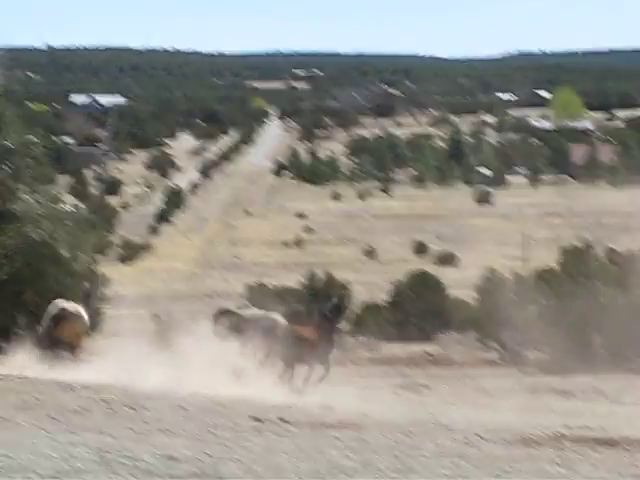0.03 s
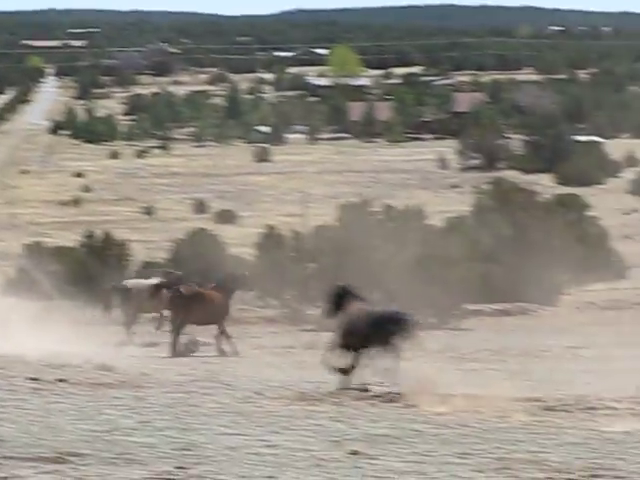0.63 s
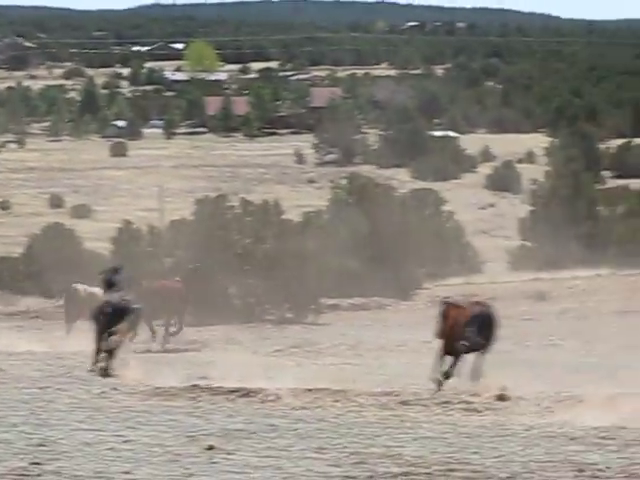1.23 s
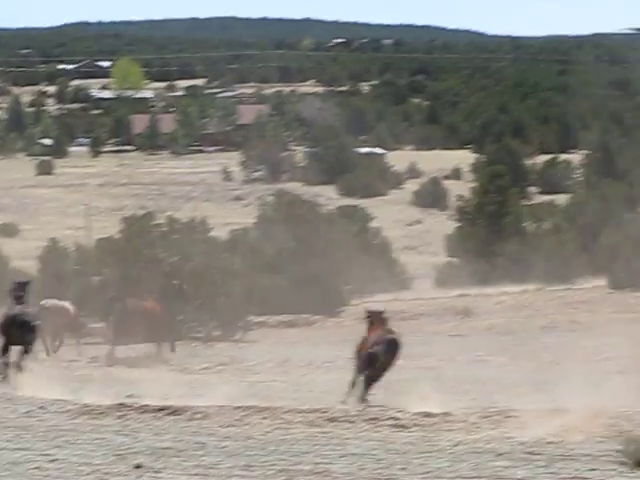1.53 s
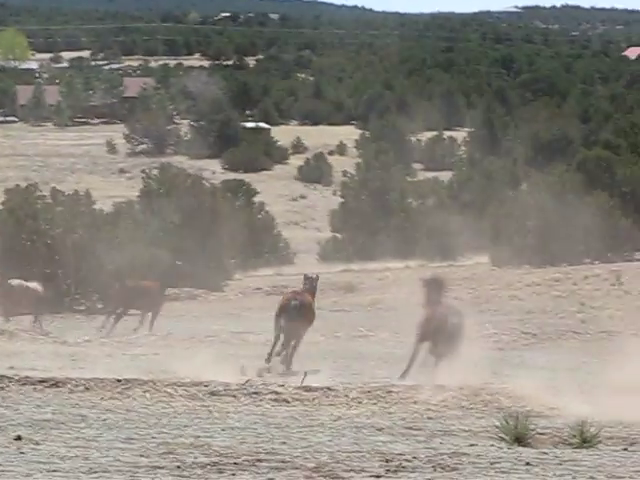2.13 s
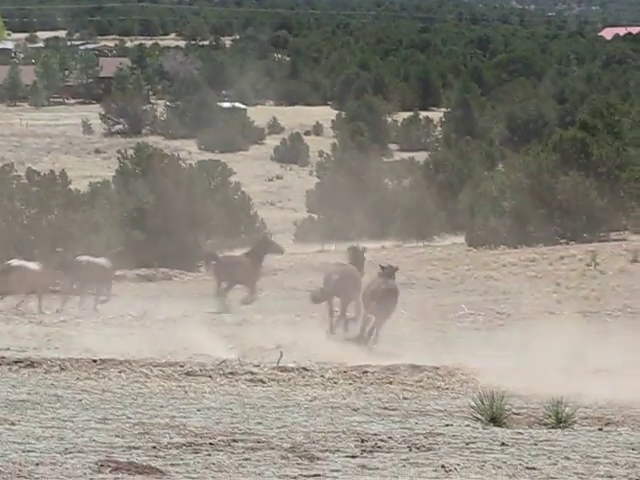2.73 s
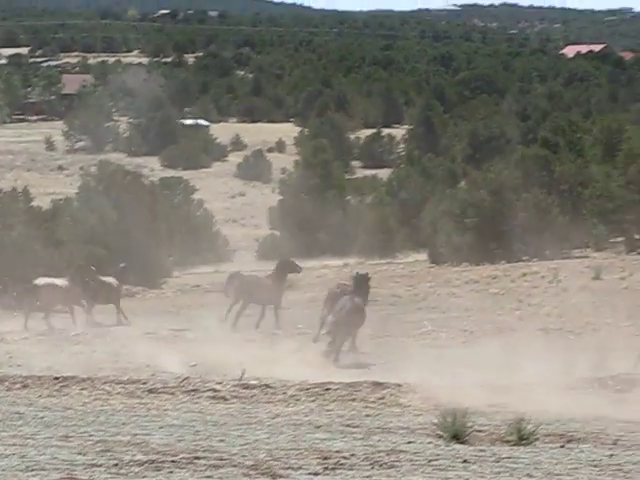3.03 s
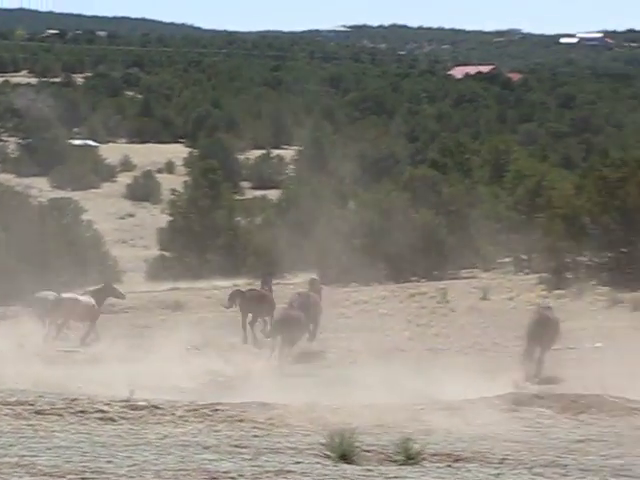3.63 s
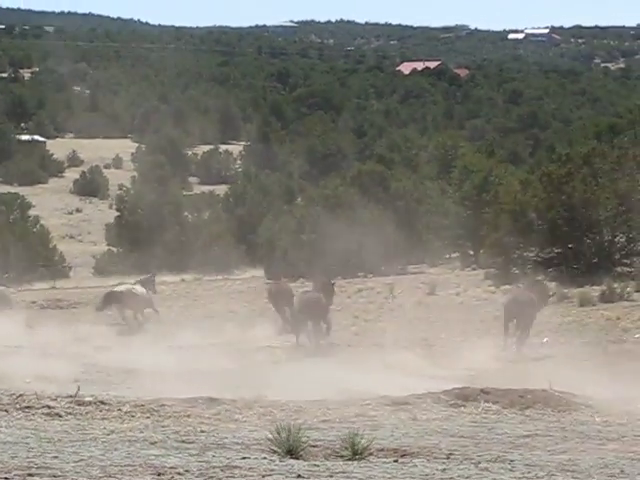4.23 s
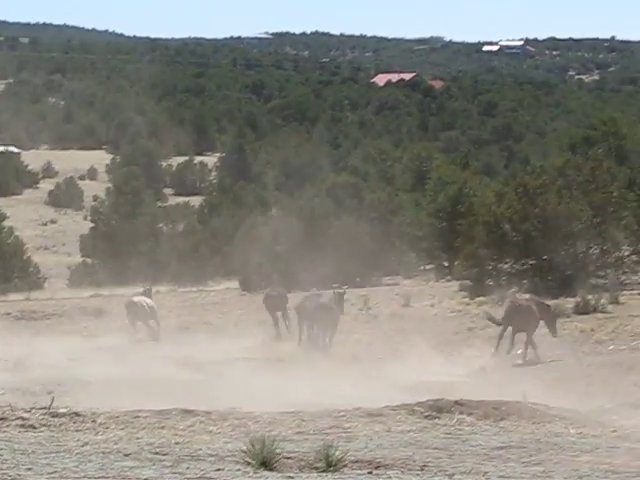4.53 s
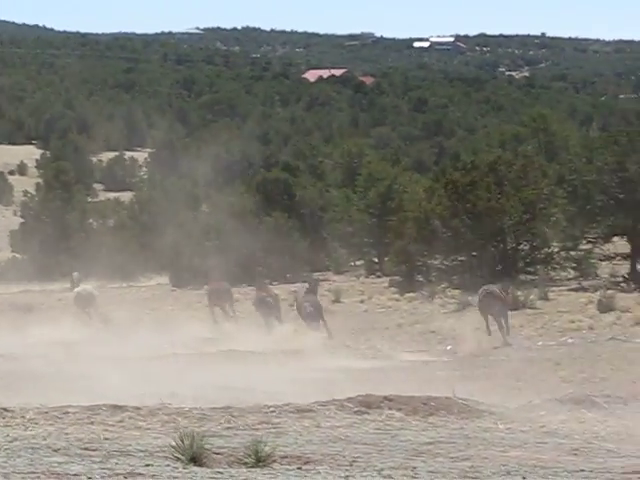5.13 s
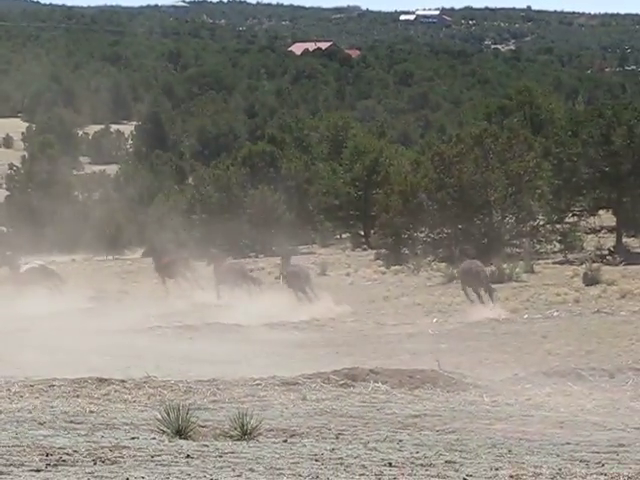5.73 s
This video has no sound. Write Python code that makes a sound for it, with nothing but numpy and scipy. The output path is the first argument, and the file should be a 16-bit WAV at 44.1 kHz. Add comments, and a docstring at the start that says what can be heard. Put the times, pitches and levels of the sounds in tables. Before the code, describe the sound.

From the start, wind buffets a small camera microphone with a low, uneven rumble, the loudest sound throughout. Underneath, several horses gallop over dry ground, their dull, overlapping hoofbeats almost covered. A distant songbird warbles in quick, high, slurred whistles, clearest at about 1.3 seconds, over a faint steady hiss. From about 0.8 seconds the wind breaks into short slaps and tiny gaps. It hits hardest between 1.8 and 2.3 seconds, where the peaks briefly push down the bird and hiss and leave a faint crackle. More slaps come between 3 and 3.5 seconds. After that the wind gradually eases, stalls for a moment just before 5 seconds, then returns and weakens toward the end near 6 seconds. The bird becomes fainter and sparser in the second half, and the hoofbeats slowly recede across the open pasture.

```python
"""A herd gallops away over a dry pasture on a gusty day, heard through a small camera.
From the start, wind buffets the microphone and all but covers the dull hoofbeats; a songbird warbles
far off. Around two seconds in, the gusts slap hardest, and on their peaks the camera's limiter ducks
bird and hiss, crackling faintly. Later the wind eases, stalling briefly near five seconds, while the
bird grows fainter and the hooves slowly recede."""
import sys
import numpy as np
from scipy import signal
from scipy.io import wavfile

SR = 44100
rng = np.random.default_rng(int(sys.argv[2]) if len(sys.argv) > 2 else 0)


def master_out(mix):
    """Clip the mix to full scale and print it as 16-bit PCM to the path in sys.argv[1]."""
    frames = np.transpose(np.atleast_2d(mix))
    ceiling = np.clip(frames, -1, 1)
    pcm = np.round(ceiling * 32767).astype(np.int16)
    wavfile.write(sys.argv[1], SR, pcm)


N = 258867
TIME = np.arange(N) / SR


def from_db(db):
    """Decibels to gain."""
    return 10 ** (np.asarray(db) / 20)


def unit_rms(x):
    """Scale to an rms of 1."""
    return x / np.sqrt(np.mean(x ** 2) + 1e-20)


def db_at(curve, hz):
    """Read an EQ curve on a log-frequency axis."""
    curve_hz, curve_db = np.transpose(curve)
    return np.interp(np.log(hz), np.log(curve_hz), curve_db)


def butter(x, hz, kind, order=2):
    """Butterworth filter."""
    sections = signal.butter(order, np.clip(hz, 10, .45 * SR), kind, fs=SR, output="sos")
    return signal.sosfilt(sections, x + 1e-18)


def drift(rate_hz):
    """Smooth random wander with a spread of 1, drawn at a tenth of the sample rate."""
    pole = np.exp(-20 * np.pi * rate_hz / SR)
    noise = rng.standard_normal(N // 10 + 4002)
    slow = signal.lfilter([1], [1, -2 * pole, pole * pole], noise)[4000:]
    return np.interp(np.arange(N) / 10, np.arange(len(slow)), unit_rms(slow))


def noise_bands():
    """Yield centre in Hz and samples for half-octave bands of noise with unit power per Hz."""
    edges_hz = 22 * 2 ** np.arange(0, 9.6, .5)
    white = rng.standard_normal((2, N)) * np.sqrt(SR / 2)
    for k, (low, high) in enumerate(zip(edges_hz, edges_hz[1:])):
        yield np.sqrt(low * high), butter(white[k % 2], [low, high], "band", order=3)


# The tone of the background bed. Each row: frequency in Hz, relative level in dB.
HISS_COLOUR = [(100, 10.5), (1000, 14), (2000, 2.5), (4000, 1.5), (6000, -0.5), (9000, -3), (12000, -1),
               (15500, -5)]

def hiss(level_db=-51.5):
    """Microphone hiss and far countryside blend into a steady, smooth bed."""
    bed = sum(band * from_db(db_at(HISS_COLOUR, hz)) for hz, band in noise_bands())
    return from_db(level_db) * unit_rms(bed)


# Touches of fizz on top. Each row: start in seconds, length in seconds, level in dB.
SIZZLE_CUES = [(1.276, 0.047, -56.5), (1.512, 0.11, -56.5)]

def sizzle(band_hz=(10000, 13200)):
    """Two faint, brief sizzles swell and fade high in the treble."""
    swell = sum(from_db(db) * np.sin(np.pi * np.clip((TIME - start) / length, 0, 1))
                for start, length, db in SIZZLE_CUES)
    return swell * unit_rms(butter(rng.standard_normal(N), band_hz, "band"))


# The bird's pitch bends, by name. Each entry: offset in semitones at start, middle and end.
SLUR_SHAPES = {"fall": (3, 0, -3), "rise": (-2, 0, 3), "arch": (-3.5, 0, -4.5), "dip": (5, 0, 6),
               "hold": (-1.5, 0, -.7)}
# The song. Each row: start in seconds, length in seconds, middle pitch in Hz, level in dB, slur name.
SYLLABLES = [(0.128, .05, 3080, -46, "fall"), (0.317, 0.066, 4200, -41, "arch"),
             (0.448, 0.058, 4200, -55.5, "fall"), (0.664, 0.088, 3140, -47, "dip"),
             (0.732, .065, 2950, -51, "dip"), (1.028, .036, 5480, -48, "rise"),
             (1.146, 0.05, 3920, -46, "hold"), (1.268, 0.061, 3890, -39.5, "hold"),
             (1.327, 0.059, 3420, -41, "rise"), (1.378, 0.031, 3620, -35.5, "fall"),
             (1.422, .05, 4250, -50, "rise"), (1.522, 0.031, 4270, -43, "hold"),
             (1.544, 0.046, 3650, -43.5, "fall"), (1.71, 0.056, 4240, -46, "fall"),
             (1.869, 0.091, 3900, -46, "arch"), (2.224, 0.071, 4040, -48, "fall"),
             (2.407, 0.038, 3830, -48, "fall"), (2.455, 0.048, 3540, -46, "fall"),
             (2.617, 0.035, 3160, -53, "fall"), (2.72, .035, 3650, -43, "fall"),
             (2.755, .035, 3400, -45, "hold"), (2.859, .075, 3620, -53.5, "hold"),
             (3.54, 0.063, 3300, -56, "fall"), (3.73, .041, 3300, -54, "fall"),
             (3.775, 0.039, 4180, -46.5, "arch"), (3.84, .04, 4550, -59, "rise"),
             (4.083, .06, 3650, -59, "fall"), (4.276, 0.057, 4200, -54, "rise"),
             (4.285, .04, 3300, -54, "dip"), (4.412, 0.05, 3580, -56, "fall"),
             (4.612, .045, 3900, -48, "arch"), (4.645, .048, 3350, -47, "fall"),
             (5.208, 0.075, 3030, -58.5, "dip"), (5.425, 0.099, 3420, -66, "dip")]

def bird(tremble=0.014, ragged_db=4, second_voice_db=-11, second_ratio=1.13, echo_db=-31, echo_s=0.057):
    """Quick slurred whistles from both sides of the syrinx, scattered by junipers and moving air."""
    direct, scattered = np.zeros(N), np.zeros(N)
    waver = 1 + tremble * drift(190)
    for start, length, middle_hz, db, slur in SYLLABLES:
        on = (TIME >= start) & (TIME < start + length)
        progress = (TIME[on] - start) / length
        semitones = np.polyval(np.polyfit([0, .5, 1], SLUR_SHAPES[slur], 2), progress)
        pitch_hz = middle_hz * 2 ** (semitones / 12) * waver[on]
        phase = 2 * np.pi * np.cumsum(pitch_hz) / SR
        voices = np.sin(phase) + from_db(second_voice_db) * np.sin(second_ratio * phase)
        note = np.sin(np.pi * progress) ** 0.25 * voices
        direct[on] += from_db(db) * note
        scattered[on] += from_db(0.5 * db) * note   # fainter notes come through wetter
    tree_tail = rng.standard_normal(SR // 4) * np.exp(-TIME[:SR // 4] / echo_s)
    echo = signal.fftconvolve(scattered, tree_tail / np.linalg.norm(tree_tail))[:N]
    return direct * from_db(ragged_db * drift(47)) + from_db(echo_db) * echo


def hooves(horses=5, stride_hz=2.1, level_db=-33, recede_db_per_s=-0.5, thud_hz=190,
           dirt_db=-17, dirt_hz=800, dirt_s=0.012):
    """Each horse lands four hooves a stride, then flies; a hoof thuds and throws up dry dirt."""
    footfalls = [0, .14, .36, .52]   # in fractions of a stride
    impacts = np.zeros(N)
    for phase, pace, lightness in rng.random((horses, 3)):
        beats = (np.arange(-1, 16)[:, None] + phase + footfalls).ravel()
        beats += rng.normal(0, 0.03, len(beats))   # loosen the timing
        own_stride_hz = stride_hz * (.95 + .1 * pace)
        at = (beats / own_stride_hz * SR).astype(int)
        heard = (at >= 0) & (at < N)
        impacts[at[heard]] += from_db(-6 * lightness + rng.normal(0, 0.94, len(at)))[heard]
    thud = butter(butter(impacts, thud_hz, "low"), 73, "high")
    puffs = signal.lfilter([1], [1, -np.exp(-1 / (dirt_s * SR))], impacts + 1e-18)
    dirt = butter(puffs * rng.standard_normal(N), dirt_hz, "low")
    fade = from_db(level_db + recede_db_per_s * TIME)
    return fade * (unit_rms(thud) + from_db(dirt_db) * unit_rms(dirt))


# The wind's fader moves. Each row: time in seconds, then rumble and flutter levels in relative dB.
GUSTS = [(0.0, -14.5, -29), (0.551, -15.5, -26.5), (1.149, -16, -29), (1.529, -23, -35.5),
         (1.598, -16.5, -28.5), (1.781, -14.5, -22), (2.249, -15.5, -23.5), (2.65, -14.5, -29),
         (2.9, -16, -26.5), (3.171, -12.5, -32), (3.421, -18, -41), (3.65, -16.5, -30), (4.0, -19, -37.5),
         (4.6, -17, -33.5), (5.12, -17, -33), (5.54, -19, -41), (5.61, -21.5, -48.5), (5.87, -19, -46)]

def gust_levels():
    """The wind rises and falls: level curves in dB for its low rumble and the flutter above it."""
    times, rumble_db, flutter_db = np.transpose(GUSTS)
    return np.interp(TIME, times, rumble_db), np.interp(TIME, times, flutter_db)


def heave(level_db=-6.0, full_wind_db=-15, top_hz=10):
    """Strong wind pushes slowly on the microphone port, below hearing, enough to work the limiter."""
    rumble_db, _ = gust_levels()
    strength_db = 1.5 * np.minimum(rumble_db - full_wind_db, 0)   # falls away faster than the rumble
    subsonic = butter(rng.standard_normal(N + SR), top_hz, "low", order=6)[SR:]
    pressure = from_db(level_db + strength_db) * np.tanh(unit_rms(subsonic))
    return butter(pressure, 2 * top_hz, "low", order=5)


# Fast eddies that slap the microphone.
# Each row: start in seconds, relative peak in dB, length in seconds, low-pass corner in Hz.
EDDY_HITS = [(0.022, -3.5, 0.0097, 566), (0.054, 0, 0.0041, 1190), (0.061, -6, .02, 1890),
             (0.813, -11, 0.0074, 1450), (0.866, -11.5, 0.0028, 1860), (0.879, 3.5, 0.0038, 404),
             (0.890, 3, 0.0012, 1550), (0.917, -15, 0.027, 1300), (0.924, 2, 0.0044, 3300),
             (1.014, -4, 0.011, 407), (1.083, -9, 0.039, 1106), (1.149, -10.5, .04, 1400),
             (1.251, 0, 0.015, 605), (1.57, -0.5, 0.0048, 636), (1.633, -4.5, 0.0054, 1010),
             (1.664, -7.5, .003, 900), (1.764, -0.5, 0.0046, 715), (1.801, -3, 0.012, 1590),
             (1.905, 0, 0.021, 850), (2.012, -11, 0.096, 1700), (2.081, -9.5, 0.0062, 1730),
             (2.182, 2, 0.0021, 780), (2.245, 7, 0.0032, 770), (2.992, -15.5, 0.05, 1430),
             (3.103, -3, 0.018, 620), (3.194, -3.5, 0.0014, 1030), (3.208, -2, 0.002, 960),
             (3.247, -7, .008, 990), (3.265, -8.5, 0.048, 1390), (3.399, -12.5, 0.0026, 995),
             (3.425, -8.5, .005, 850), (3.792, -3, 0.012, 1020), (4.308, -10, 0.01, 810),
             (4.537, -10, 0.0068, 860), (4.795, -3, 0.0055, 460), (5.126, -11, 0.015, 880),
             (5.198, -13, 0.011, 680), (5.551, -17, 0.014, 880)]

def slaps(level_db=-2.7, port_hz=2700, punch=4.4, ragged_db=4):
    """An eddy hits with a pressure step and tears up into a short ragged burst."""
    out, t = np.zeros(N), TIME[:SR // 8]
    for start, peak_db, length, corner_hz in EDDY_HITS:
        tearing = rng.standard_normal(len(t)) * from_db(ragged_db * drift(270)[:len(t)])
        step = punch * rng.choice([-1, 1]) * np.exp(-2 * np.pi * corner_hz * t)
        pressure = step + tearing * np.exp(-(t / length) ** 4)
        burst = butter(butter(pressure, corner_hz, "low", order=3), port_hz, "low", order=5)
        burst = butter(burst, 0.092 * corner_hz, "high")   # small eddies carry little bass
        peak = 2 * np.sqrt(np.sum(burst ** 2) / (length * SR))   # about twice the rms
        at = round(start * SR)
        out[at:at + len(t)] += (from_db(peak_db + level_db) * burst / peak)[:N - at]
    return out


# Holes in the wind. Each row: centre in seconds, half width in seconds, dip in dB.
LULL_CUES = [(0.107, 0.013, -3), (0.31, 0.027, -1.5), (0.761, 0.016, -2.5), (0.848, 0.018, -9),
             (0.901, 0.003, -5), (0.974, 0.028, -12), (1.123, 0.0071, -1.5), (1.216, 0.018, -8),
             (1.447, 0.02, -9.5), (1.548, .012, -2), (2.645, .012, 0), (3.081, 0.014, -6.5),
             (3.36, .025, -1.5), (3.478, 0.011, -18.5), (4.24, 0.033, -2), (4.917, 0.096, -20.5),
             (5.345, 0.017, -4.5)]

def lulls(steepness=5):
    """The air stalls for a moment: a level curve in dB with steep-sided dips."""
    return sum(db * np.exp(-np.abs((TIME - centre) / half_width) ** steepness)
               for centre, half_width, db in LULL_CUES)


def vortex_pops(per_s=110, level_db=-5, spread_db=1.0):
    """Single vortices pop against the port: random clicks, levelled against the noise bands."""
    sizes = from_db(spread_db * np.clip(rng.standard_normal(N), -2, 2)) * rng.choice([-1, 1], N)
    clicks = sizes * (rng.random(N) < per_s / SR)
    return from_db(level_db) * np.sqrt(SR / 2) * unit_rms(clicks)


# The average tone of the buffeting. Each row: frequency in Hz, relative level in dB.
BUFFET_COLOUR = [(25, -25), (50, -50), (72, -15), (112, -0.5), (190, 2), (300, -0.5), (450, -2.5),
                 (720, -10), (1200, -22), (1820, -35), (3000, -44.5)]

def buffeting(level_db=-27.5, push_db=3.5, knee_hz=320, flutter_hz=1300, usual_flutter_db=-13,
              eddy_db=3.5, eddy_hz=75, surge_db=0.85, surge_hz=10, roll_hz=2600, roll_db_per_octave=-21):
    """Turbulence at the port: faster air sheds smaller eddies, so gusts swell the upper bands most."""
    rumble_db, flutter_db = gust_levels()
    lull_db = lulls()
    force = np.clip((flutter_db + 35) / 9, 0, 1)   # 0 in a breeze, 1 in a full gust
    flutter_db += 5.5 * np.tanh(lull_db / 0.5)   # the flutter dies first, even in a shallow lull
    flutter_db += surge_db * drift(surge_hz)
    brightness_db = flutter_db - rumble_db - usual_flutter_db
    eddies = 1.4 * np.tanh(drift(eddy_hz) / 2)   # these shake all bands together
    pops = vortex_pops()
    out = np.zeros(N)
    for hz, band in noise_bands():
        smallness = np.clip(np.log(hz / knee_hz) / np.log(flutter_hz / knee_hz), 0, 1.15)   # of the eddies
        colour_db = db_at(BUFFET_COLOUR, hz) + roll_db_per_octave * max(0, np.log2(hz / roll_hz))
        swell_db = smallness * brightness_db + eddy_db * eddies + 0.17 * drift(22)
        popping = butter(pops, [hz / 2 ** .25, hz * 2 ** .25], "band", order=1)
        popping = butter(popping, 2 * hz, "low", order=3)
        out += (band + smallness * popping) * from_db(colour_db + swell_db)
    return out * from_db(level_db + rumble_db + lull_db + push_db * force)


def scene():
    """The mono mix: wind on the microphone up front, the pasture behind it."""
    return (buffeting() + heave() + slaps() + hooves() + bird() + sizzle() + hiss())[None, :]


def limiter(x, threshold_db=-6, release_db_per_s=150, attack_s=0.0012, step_db=0.73, subsonic_hz=39):
    """The gain ducks on each peak, heard or subsonic, and creeps back; its small steps crackle faintly."""
    over_db = np.maximum(20 * np.log10(np.abs(x) + 1e-9) - threshold_db, 0)
    release_db = release_db_per_s * TIME
    held_db = np.maximum.accumulate(over_db + release_db, axis=-1) - release_db
    pole = np.exp(-1 / (attack_s * SR))
    duck_db = signal.lfilter([1 - pole], [1, -pole], held_db)
    stepped_db = step_db * np.round(duck_db / step_db)
    return butter(x, subsonic_hz, "high", order=6) * from_db(-stepped_db)


def record(dry, ceiling=1.2, low_cut_hz=58, dull_hz=10500, cutoff_hz=15500):
    """The camera's chain: limiter, soft clip on the hardest slaps, wind filter, dull top, steep cutoff."""
    rounded = ceiling * np.tanh(limiter(dry) / ceiling)
    thinned = butter(rounded, low_cut_hz, "high", order=3)
    dulled = butter(thinned, dull_hz, "low")
    return signal.sosfilt(signal.ellip(10, .1, 90, cutoff_hz, fs=SR, output="sos"), dulled)


dry = scene()
out = record(dry)
master_out(out)
```